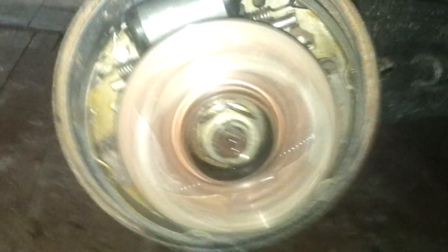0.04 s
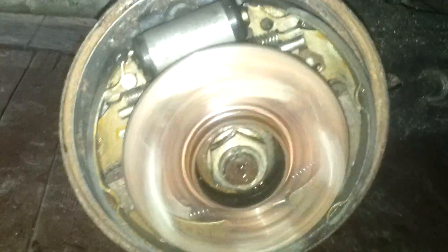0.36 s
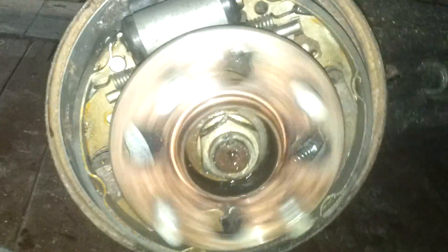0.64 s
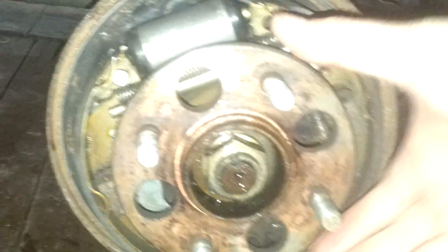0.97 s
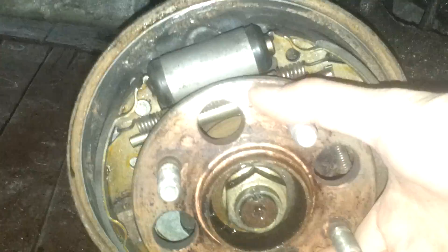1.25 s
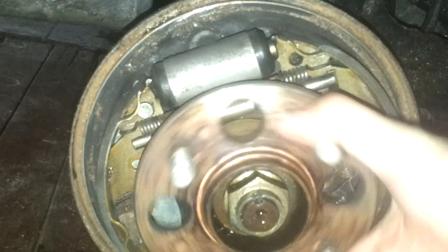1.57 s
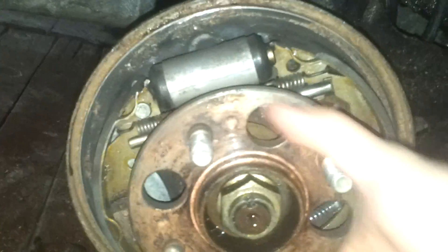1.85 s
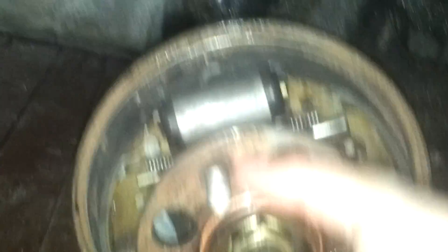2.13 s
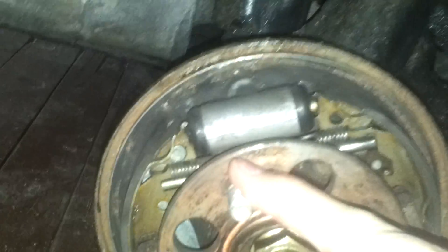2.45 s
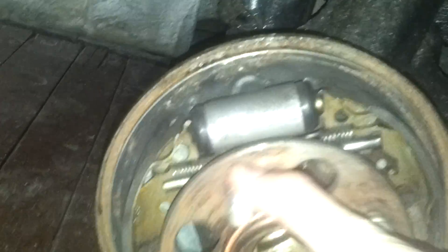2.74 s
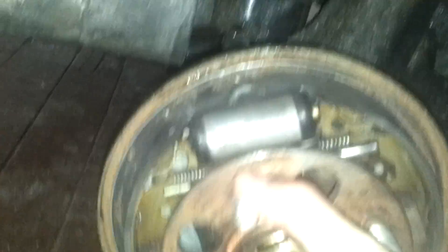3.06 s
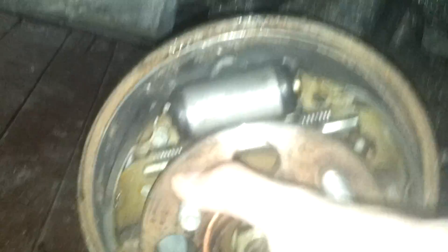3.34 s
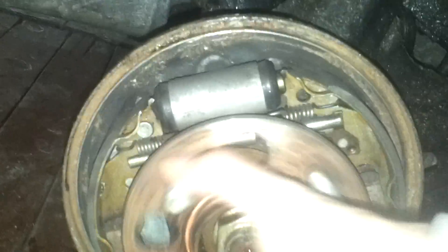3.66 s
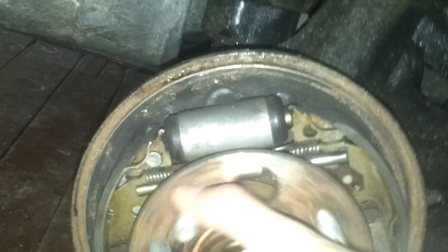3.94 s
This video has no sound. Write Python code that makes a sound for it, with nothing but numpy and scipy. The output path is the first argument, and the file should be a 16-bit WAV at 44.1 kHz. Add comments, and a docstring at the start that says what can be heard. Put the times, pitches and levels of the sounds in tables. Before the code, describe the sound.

A worn wheel bearing rumbles and grinds loudly up close, with a metallic ring, pulsing slower and fading to a stop by about 0.8 seconds. Until about 2.5 seconds a hand faintly rubs the steel hub, with small scattered ticks and a thin high squeak near 2 seconds. From 3.4 seconds the nudged bearing grates softly in short spells. Low room rumble and hiss lie underneath.

```python
"""A workshop, close to a bare wheel hub spinning down on a worn bearing. The rollers grind over the pitted
race and ring the hub and its backing plate, pulsing ever more slowly until it stops. A hand then slides
over the flange, with small ticks and one thin squeak, and nudges the hub round so that the bearing
grates again. Room rumble and hiss lie underneath."""
import sys
import numpy as np
from scipy import signal
from scipy.fft import rfft, irfft, next_fast_len
from scipy.io import wavfile
from scipy.ndimage import map_coordinates

SR = 44100
rng = np.random.default_rng(int(sys.argv[2]) if len(sys.argv) > 2 else 0)


def log_audio(samples):
    """Write samples as a 16-bit WAV file to the path given in sys.argv[1]."""
    # one column per channel
    frames = np.atleast_2d(samples).T
    # limit to full scale, then quantise
    limited = np.clip(frames, -1, 1)
    pcm = np.round(limited * 32767).astype(np.int16)
    wavfile.write(sys.argv[1], SR, pcm)


N = 176400
TOP_HZ = 14700

# left-right likeness of the hub: f/Hz, correlation
HUB_CORRELATION = [(100, 1), (600, 0.81), (1000, 0.64), (1400, .65), (1700, 0.24), (2400, 0.22),
                   (3300, 0.23), (4500, 0.18), (6000, 0.36)]


def amp(db):
    """Decibels to gain."""
    return 10 ** (np.asarray(db) / 20)


def unit(x):
    """Scale to rms 1."""
    return x / np.sqrt(np.mean(x ** 2) + 1e-20)


def at_hz(table, hz):
    """Table columns interpolated over log frequency."""
    f, *columns = np.transpose(table)
    return np.array([np.interp(np.log(hz + 1), np.log(f + 1), c) for c in columns])


def curve_db(points):
    """Level per sample, silent after the last point."""
    return np.interp(np.arange(N) / SR - 1e-9, *np.transpose(points), right=-140)


def wobble(rate_hz):
    """Smooth random curve through unit-variance knots."""
    knots = rng.standard_normal(int(N * rate_hz / SR) + 4)
    return map_coordinates(knots, [np.arange(N) * rate_hz / SR])


def pan(left_over_right_db):
    """Left and right gains."""
    return amp(np.array([[.5], [-.5]]) * left_over_right_db)


def impacts(rate_hz):
    """Two streams of tiny random impacts, rms 1."""
    chance = np.clip(rate_hz / SR, 1e-3, 1)
    return (rng.random((2, N)) < chance) * rng.standard_normal((2, N)) / np.sqrt(chance)


def strokes(rows, skew):
    """Envelope of swells added in power; skew below 1 brings each peak forward."""
    t = np.arange(N) / SR
    power = 0
    for start_s, length_s, db in rows:
        progress = np.clip((t - start_s) / length_s, 0, 1)
        power += (amp(db) * np.sin(np.pi * progress ** skew)) ** 2
    return np.sqrt(power)


def resonate(drive, spectrum, modes=(), correlation=((100, 0), (1000, 0))):
    """Two drives ring a stereo body of broad spectrum and narrow modes, scaled to unit power gain."""
    size = 2 * next_fast_len(N // 2 + SR // 4)
    hz = np.fft.rfftfreq(size, 1 / SR)
    peaks = 1 + sum(np.abs(amp([[left], [right]]) ** 2 - 1) / (1 + (2 * (hz - f) / width) ** 2)
                    for f, width, left, right in modes)
    magnitude = amp(at_hz(spectrum, hz)) * np.sqrt(peaks)
    cepstrum = irfft(np.log(magnitude))
    cepstrum[:, 1:size // 2] *= 2  # fold to minimum phase
    cepstrum[:, size // 2 + 1:] = 0
    body = np.exp(rfft(cepstrum))
    rms_gain = np.sqrt(np.sum(np.abs(body[:, hz < TOP_HZ]) ** 2) / (2 * len(hz)))
    spread_rad = np.arccos(np.clip(at_hz(correlation, hz)[0], -1, 1)) / 2
    mid, side = rfft(drive, size) * [np.cos(spread_rad), np.sin(spread_rad)]
    return irfft(np.array([mid + side, mid - side]) * body / rms_gain, size)[:, :N]


def hub_phase_shift(pair):
    """The hub's sound arrives left and right out of step."""
    left_lead = [(20, 3.4), (260, 3.1), (1100, 3.1), (1500, 6.62), (2240, 9.57), (3530, 19.2), (5400, 19.2),
                 (14000, 35.4)]  # f/Hz, lead/rad
    size = next_fast_len(N + SR // 2)
    lead_rad = at_hz(left_lead, np.fft.rfftfreq(size, 1 / SR))
    shift = np.exp(1j * lead_rad * np.array([[.5], [-.5]]))
    return irfft(rfft(pair, size) * shift, size)[:, :N]


def room_tone():
    """Steady rumble and hiss with one low room resonance."""
    spectrum = [(24.8, -27.5, -47.5), (60.0, -16, -20.5), (100.0, -7.5, -10.5), (166, -6.0, -7),
                (247, -7.5, -12.0), (460, -13.5, -12), (660, -15.5, -12), (1570, -20, -15),
                (4860, -21, -17.5), (5860, -26.5, -21), (8500.0, -20, -18.5), (11600, -14.5, -18.5),
                (14000, -20.5, -20.5)]  # f/Hz, left/dB, right/dB
    boom = [(102, 40, 4.5, 1.5)]  # f/Hz, width/Hz, left/dB, right/dB
    likeness = [(60, -1.2), (130, -0.56), (300, -0.24), (1400, 0.012), (5000, 0)]  # f/Hz, left-right correlation (clipped to +-1)
    return resonate(rng.standard_normal((2, N)) * amp(-54.5), spectrum, boom, likeness)


def reverb(x, t60_s=.16, gain_db=-5.5):
    """Short diffuse tail of the workshop."""
    t = np.arange(SR // 3) / SR
    tail = rng.standard_normal((2, len(t))) * amp(-60 * t / t60_s)
    return amp(gain_db) * signal.fftconvolve(x, tail / np.linalg.norm(tail[0]), axes=1)[:, :N]


def ticks(snap_db=-9.5, snap_t60_s=.005):
    """Grit and metal tick: a broadband snap plus a brief burst in one band."""
    # t/s, relative level/dB, f/Hz, half-width/octaves, t60/s, left over right/dB
    events = [(0.154, -36.5, 11300, .18, 0.027, 17), (.224, -40, 12140, 0.12, 0.03, 17),
              (0.2814, -23.5, 9250, 0.22, 0.019, 9), (.343, -44, 10300, .12, .02, 10),
              (.636, -38.5, 11500, 0.24, .015, 8), (.949, -39, 4300, 0.64, .008, -6),
              (1.369, -39.5, 4670, 0.73, 0.008, -17), (1.49, -39.5, 4260, .4, 0.0096, -11),
              (1.7325, -33, 4070, 0.38, 0.0062, -12.5), (1.8086, -31.5, 4400, 0.22, 0.0045, -13.5),
              (1.9165, -36, 11300, .25, .03, 12), (2.123, -37, 4560, .5, .005, -5),
              (2.2267, -35.5, 12400, 0.29, .006, 10), (2.4224, -29, 4460, 0.19, 0.0042, -10),
              (2.6358, -43, 12500, 0.28, .006, 8), (2.798, -24.5, 9050, 0.26, 0.008, 9),
              (2.801, -40.5, 7500, .45, .035, -13), (3.0803, -41, 10500, 0.27, .008, 9),
              (2.731, -51, 3250, .08, 0.096, -4), (3.81, -46.5, 3300, .07, 0.037, -6)]
    track = np.zeros((2, N + SR))
    t = np.arange(SR // 8) / SR
    for start_s, db, hz, octaves, t60_s, pan_db in events:
        edges_hz = np.clip([hz / 2 ** octaves, hz * 2 ** octaves], 100, SR / 2 - 100)
        band = signal.butter(2, edges_hz, "bandpass", fs=SR, output="sos")
        decay = amp(-60 * t / t60_s)
        burst = signal.sosfilt(band, rng.standard_normal((2, len(t))) * decay)
        burst *= np.linalg.norm(decay) / np.linalg.norm(burst, axis=1, keepdims=True)
        snap = amp(snap_db - 60 * t / snap_t60_s) * rng.standard_normal((2, len(t)))
        onset = round(start_s * SR)
        track[:, onset:onset + len(t)] += amp(db - 6) * (burst + snap) * pan(pan_db)
    return track[:, :N]


def hand():
    """Fingers hiss over rusty steel; the gripping palm scuffs and rings the flange."""
    rubs = [(.69, 0.13, -53.5), (.785, 0.064, -53.5), (.83, 0.12, -55), (1.065, 0.14, -54.5),
            (1.15, 0.12, -57.5), (1.367, .035, -49.5), (1.725, 0.13, -52), (1.815, 0.11, -52.5),
            (1.918, .05, -46.5), (1.91, 0.19, -50), (2.05, 0.17, -55), (2.15, 0.32, -59), (3.3, .35, -72)]  # t/s, length/s, level/dB
    scuffs = [(.78, 0.11, -73), (1.022, 0.025, -54.5), (1.09, .1, -58.5), (1.36, 0.2, -57.5),
              (1.72, 0.16, -65), (1.915, 0.17, -57), (2.05, 0.21, -57.5), (2.22, 0.12, -57),
              (3.555, 0.034, -52)]  # t/s, length/s, level/dB
    finger_spectrum = [(200, -3, -3), (2030, -13, -12.5), (4540, -10, -4), (5800, -14, -12.5),
                       (8700, -3.5, -7), (10700, 3.5, -39), (12500, 1.5, -5), (15200, -11.5, -38)]  # f/Hz, left/dB, right/dB
    palm_spectrum = [(150, -32, 8), (600, -6, -4.5), (2080, -3.5, -2.5), (3300, 0, 2.5), (4630, -17, 0.5),
                     (5930, -4.5, -13.5), (8950, 1, -7), (14000, -4, -22)]  # f/Hz, left/dB, right/dB
    flange_modes = [(3700, 110, 11, 7.5), (4560, 230, 6, 9.5), (6680, 90, 5, 9)]  # f/Hz, width/Hz, left/dB, right/dB
    fingers = impacts(6000) * strokes(rubs, skew=.36) * amp(2.2 * wobble(100))
    palm = impacts(1800) * strokes(scuffs, skew=.85) * amp(wobble(60))
    return resonate(fingers, finger_spectrum) + resonate(palm, palm_spectrum, flange_modes)


def squeak(pitch_hz=10380, wander_hz=16.3, pan_db=12):
    """A thin unsteady tone as a fingertip sticks and slips on the steel."""
    contour = [(1.86, -82), (1.905, -56.5), (1.934, -52), (1.986, -59.5), (2.018, -55.5), (2.136, -71),
               (2.25, -80)]  # t/s, level/dB
    phase = 2 * np.pi * np.cumsum(pitch_hz + wander_hz * wobble(250)) / SR
    started = np.arange(N) / SR > contour[0][0]
    envelope = started * amp(curve_db(contour) + 2.4 * wobble(90))
    return envelope * unit(np.sin(phase)) * pan(pan_db)


def nudges():
    """Turned and damped by the hand, the bearing grates in short spells."""
    pushes = [(3.40, 0.089, -53.5), (3.492, .03, -46), (3.555, 0.045, -62), (3.60, 0.1, -48),
              (3.685, 0.11, -49), (3.77, 0.18, -62)]  # t/s, length/s, level/dB
    grate_spectrum = [(100.0, -22.5, -17), (232, 5, -2.5), (460, -6, -6.5), (790, -5, -3),
                      (1310, -8.5, -8.5), (1800.0, -12, -13), (2500.0, -12.5, -9), (3730, -15.5, -8.5),
                      (5870, -22, -23), (10800, -11.5, -22)]  # f/Hz, left/dB, right/dB
    damped_modes = [(700, 43, 5.5, 5.5), (904, 41, 10, 6), (1340, 90, 4, 5), (2270, 80, 6, 4),
                    (3780, 90, 5, 4)]  # f/Hz, width/Hz, left/dB, right/dB
    drive = impacts(2500) * strokes(pushes, skew=.68) * amp(1.1 * wobble(90))
    return hub_phase_shift(resonate(drive, grate_spectrum, damped_modes, HUB_CORRELATION))


def spin_down(start_pass_hz=38, stop_s=.82):
    """Rollers strike pits in the race, hardest at the worn spot, and slow evenly to rest."""
    rolling_force = [(0, -21.5), (.011, -17), (.019, -19.5), (.06, -21), (.14, -23), (.26, -26), (.33, -28),
                     (.41, -30), (.5, -34), (.6, -41), (.68, -50), (.75, -69), (.9, -86)]  # t/s, level/dB
    # spectra of hub and plate, dull rollers, dry race: f/Hz, left/dB, right/dB
    hub_spectrum = [(60.0, -57.5, -52), (122, -38.5, -48.5), (195, -20, -23.5), (388, -18.5, -22.5),
                    (766, -12, -8.5), (1165, -15, -17), (1510, -17.5, -25.5), (2640, -20, -16),
                    (4360, -24.0, -18.5), (4630, -23, -19.5), (5060, -34.0, -30.5), (6500.0, -36, -34.5)]
    hub_treble = [(8800, -32.5, -55), (14000, -79, -64)]
    roller_spectrum = [(85, -50, -46), (138, -16, -27), (235, 1, -9.5), (343, -2.5, -6.5), (595, -5, -4),
                       (990, -9, -3.5), (1800, -14.5, -18), (4220, -14.5, -11.5), (5900, -37, -30),
                       (12000, -39, -50)]
    race_spectrum = [(4500, -39, -25), (6700, -11, -10), (7650, 1.5, 1), (9400, 4, -19), (11900, 9.5, -32),
                     (13700, 4.5, -24), (14300, -5, -66)]
    # modes of hub and plate, race: f/Hz, width/Hz, left/dB, right/dB
    hub_modes = [(350, 25, 10.5, 4), (462.4, 22, 13, 16.5), (583, 25, 11.5, 10), (798, 14, 11.5, 8),
                 (830, 14, 11.5, 11), (889.8, 14.5, 20.5, 15.5), (953, 54, 12, 10.5), (1290, 51, 14, 13),
                 (1295, 27, 10, 7), (1394, 50, 14.5, 21), (1827, 29, 3, 16.5), (1966, 30, 3, 11),
                 (2220, 54, 12.5, 12.5), (2490, 113, 10, 9.5), (2655, 20, 13, -1), (3034, 20, 9.5, 11),
                 (3298, 68, 13, 10.5), (3562, 24, 10, 12), (3820, 30, 5, 1)]
    race_modes = [(7320, 37, 21.2, 13), (8500, 80, 11.6, 4), (10070, 69, 12, 8.3), (10750, 80, 6, 3),
                  (13520, 100, 10, 3)]

    speed = np.clip(1 - np.arange(N) / SR / stop_s, 0, 1)
    passes = np.cumsum(speed) * start_pass_hz / SR - .36
    pulse = 2 * np.cos(np.pi * passes) ** 4 - 1  # +1 with a roller on the worn spot
    pits_hz = 9000 * (speed + .25)
    force_db = curve_db(rolling_force)
    fade_db = force_db - force_db.max()

    ring_drive = impacts(pits_hz) * amp(force_db + pulse + .41 * wobble(120))
    ring = resonate(ring_drive, hub_spectrum + hub_treble, hub_modes, HUB_CORRELATION)
    growl_db = -34.5 + .44 * fade_db + 2 * pulse  # growl and sizzle fade more slowly than the ring
    growl = resonate(impacts(pits_hz) * amp(growl_db), roller_spectrum, correlation=HUB_CORRELATION)
    sizzle_db = -41 + .58 * fade_db + 2 * pulse + 1.9 * wobble(47.3)
    sizzle = resonate(impacts(pits_hz) * amp(sizzle_db), race_spectrum, race_modes)
    return hub_phase_shift(ring + growl) + sizzle


def scene():
    """Hub, handling and room; reverb on the handling only."""
    handling = ticks() + hand() + squeak() + nudges()
    return spin_down() + handling + reverb(handling) + room_tone()


def record(dry):
    """Brick-wall low-pass at TOP_HZ."""
    size = next_fast_len(N + SR // 2)
    passband = np.fft.rfftfreq(size, 1 / SR) < TOP_HZ
    return irfft(rfft(dry, size) * passband, size)[:, :N]


dry = scene()
out = record(dry)
log_audio(out)
```